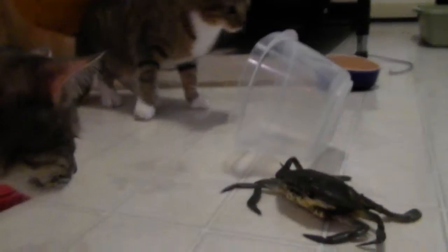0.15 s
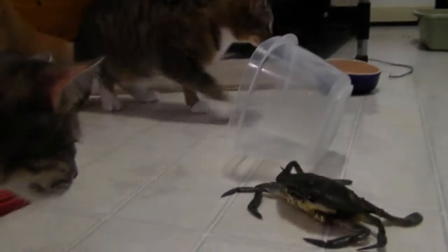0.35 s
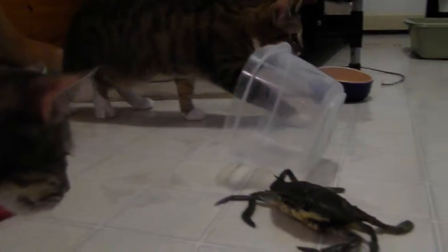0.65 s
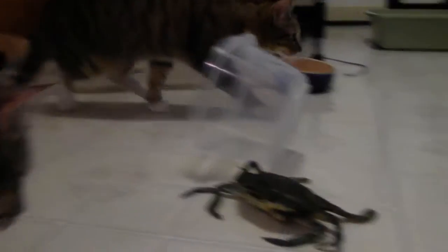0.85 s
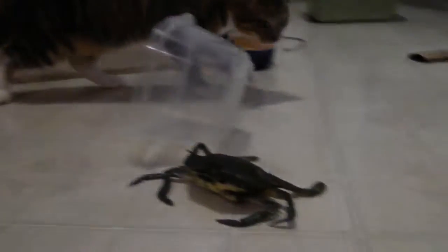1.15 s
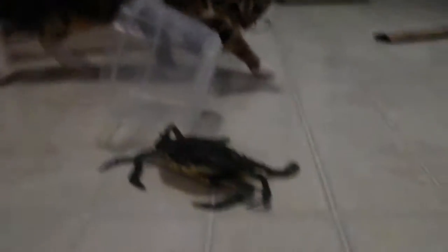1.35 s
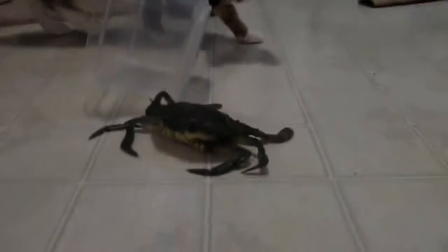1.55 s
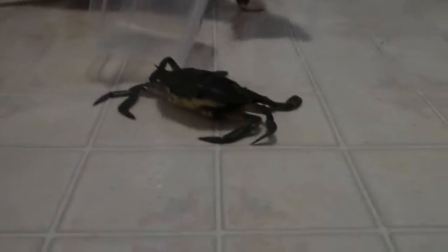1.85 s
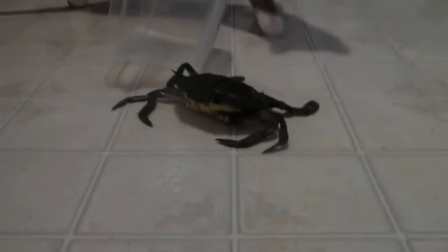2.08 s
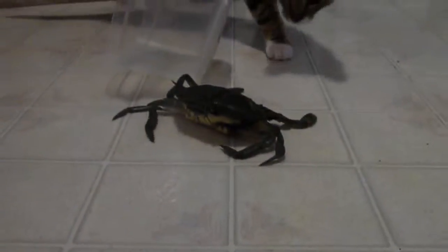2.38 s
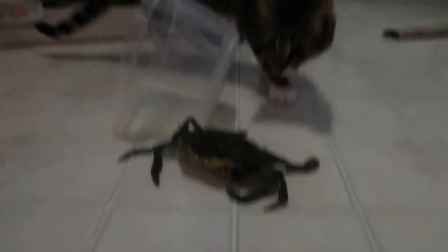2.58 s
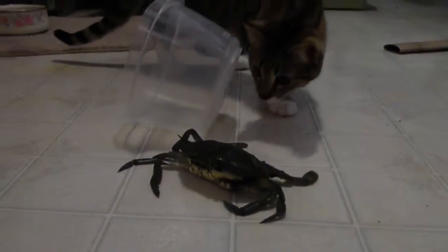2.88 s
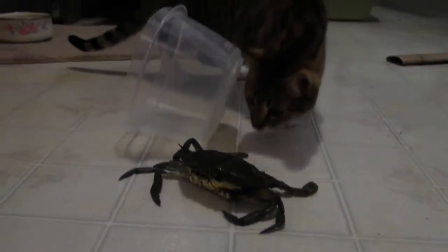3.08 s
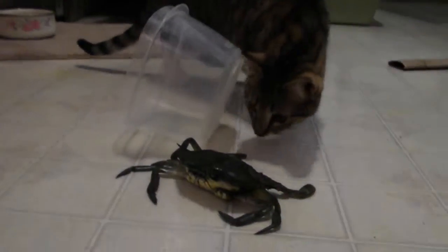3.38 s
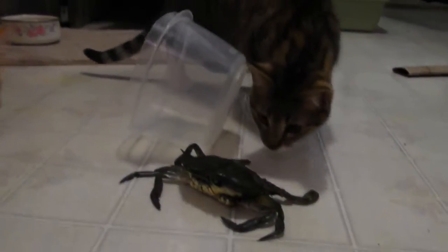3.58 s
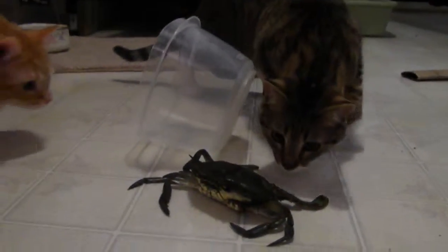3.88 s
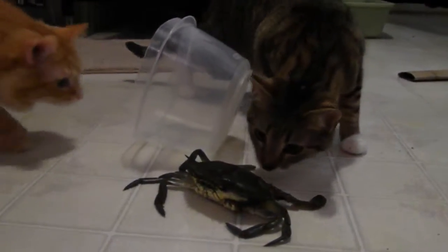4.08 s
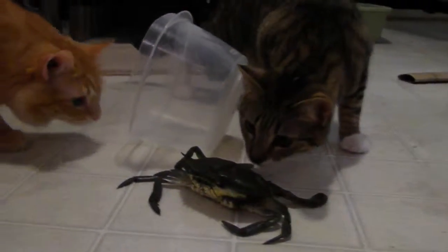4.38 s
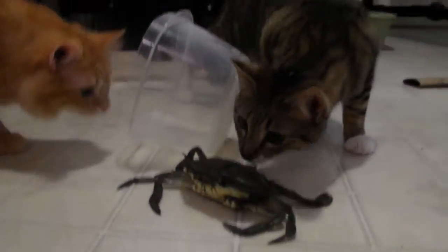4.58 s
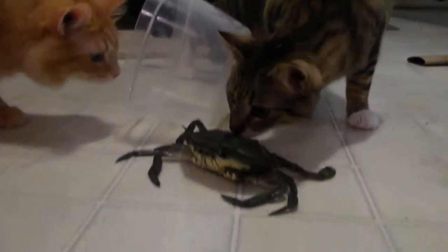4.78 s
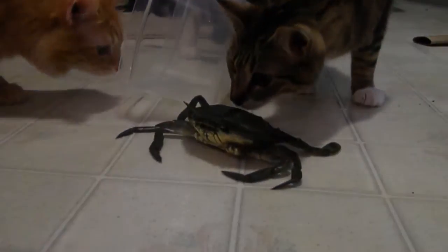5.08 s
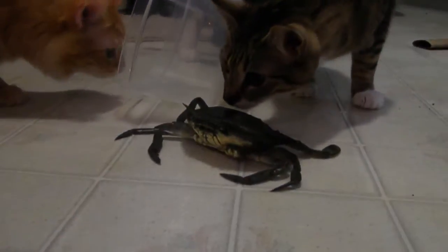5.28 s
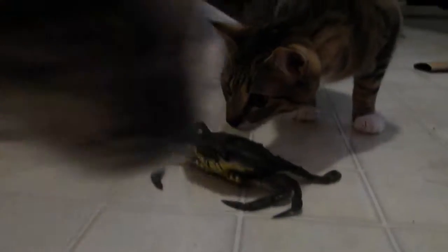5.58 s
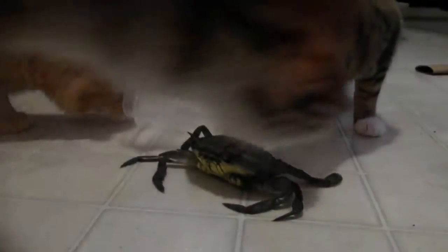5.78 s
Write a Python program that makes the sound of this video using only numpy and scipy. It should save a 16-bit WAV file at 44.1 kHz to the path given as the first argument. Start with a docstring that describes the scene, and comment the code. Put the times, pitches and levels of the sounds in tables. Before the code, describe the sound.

A small quiet room with faint steady hiss and a barely audible low hum. At 0.03 s a crisp plastic click comes with a brief skin rub; softer rubbing follows, and a low, quick stuttering creak runs from 0.35 to 0.5 s. At about 0.64 s a very loud, hard snap starts the busiest passage: hollow knocks near 0.8 and 0.97 s, bright scrapes and a sharp click around 1.03 s, then rapid thuds and clicks at 1.2-1.4 s, all close and dry. Handling weakens from 1.5 to 2.3 s into rubbing and little juddering jolts. Light clicks, scrapes and a dull knock come around 2.5 s, finger slips near 3.1 s, and a stuttering run at 3.45-3.8 s. Thin, high ticks, probably the crab on tile, appear sparsely early and gather from 3 to 5.5 s, with a small knock and scrape at 4.2 s. The end is nearly still.

```python
"""Hand on a case, crab on tiles

A hand shifts its grip on a camera case: skin rubs, scrapes, creaks and slips as modulated noise and
contact pulses; the case thuds, clicks and knocks as pulses and decaying sines. Thin ticks, probably a
crab's mouthparts and legs on a tiled floor, are noise bursts through narrow resonances. A small room
adds a decaying noise tail, over a faint hum and hiss."""
import sys
import numpy as np
from scipy import signal
from scipy.fft import rfft, irfft, next_fast_len
from scipy.io import wavfile
from scipy.ndimage import uniform_filter1d, map_coordinates

SR = 44100
rng = np.random.default_rng(int(sys.argv[2]) if len(sys.argv) > 2 else 0)


def master_out(mix):
    """Clip the mix to full scale and print it as 16-bit PCM to the path in sys.argv[1]."""
    frames = np.transpose(np.atleast_2d(mix))
    ceiling = np.clip(frames, -1, 1)
    pcm = np.round(ceiling * 32767).astype(np.int16)
    wavfile.write(sys.argv[1], SR, pcm)


N = 261933
TOP_HZ = 7700  # upper band limit of the microphone and of every contact pulse


def amp(db):
    """Decibel law: level to amplitude factor."""
    return 10 ** (np.asarray(db) / 20)


def unit(x):
    """Normalization to unit root-mean-square."""
    return x / np.sqrt(np.mean(x ** 2) + 1e-20)


def along(points, hz):
    """Interpolation of (frequency, value) points on a logarithmic frequency axis."""
    f, value = np.transpose(points)
    return np.interp(np.log(hz + 1), np.log(f + 1), value)


def wobble(rate):
    """Slow random modulation: a smooth curve through `rate` random knots per second."""
    knots = rng.standard_normal(int(N * rate / SR) + 4)
    return map_coordinates(knots, [np.arange(N) * rate / SR])


def filtered(x, response):
    """Linear filtering: the spectrum times a response of frequency."""
    size = next_fast_len(len(x) + SR // 4)
    spectrum = rfft(x, size) * response(np.fft.rfftfreq(size, 1 / SR))
    return irfft(spectrum, size)[:len(x)]


def noise(spectrum):
    """Spectral shaping of white noise; rms 1."""
    return unit(filtered(rng.standard_normal(N), lambda hz: amp(along(spectrum, hz))))


def band(x, hz, width_hz):
    """Narrow resonance: two identical resonators in series give steep sides."""
    return filtered(x, lambda f: (1j * f * width_hz / (hz * hz - f * f + 1j * f * width_hz)) ** 2)


def resonances(modes, f):
    """Modal superposition: the complex responses of all resonators add."""
    return sum(amp(db) * 1j * f * w / (c * c - f * f + 1j * f * w) for c, w, db in modes)


def add(track, s, sound):
    """Superposition: mix a sound into the track from time s."""
    part = track[max(round(s * SR), 0):][:len(sound)]
    part += sound[:len(part)]


def push(corner_hz, low_hz, order=3):
    """Contact impulse of peak 1: softer is duller, and the missing bass makes it swing back."""
    u = 2 * np.pi * corner_hz * np.arange(SR // 25) / SR
    high_pass = signal.butter(order, min(low_hz, TOP_HZ), "high", fs=SR, output="sos")
    low_pass = signal.butter(6, TOP_HZ, fs=SR, output="sos")
    swing = signal.sosfilt(high_pass, u * np.exp(-u))
    swing = signal.sosfilt(low_pass, swing)
    return swing / np.abs(swing).max()


RUN_SCATTER_S, RUN_SCATTER_DB = .0012, 1.4  # unevenness of the repeats after the first


def runs(rows, gap_s, fade_db):
    """Stick-slip repetition, nearly even and weakening: (time [s], level [dB]) of each event."""
    events = []
    for s, db, count in rows:
        events.append((s, db))
        scatter = rng.standard_normal((round(count) - 1, 2))
        for k, (late, size) in enumerate(scatter, 1):
            when = s + k * gap_s + RUN_SCATTER_S * late
            events.append((when, db - k * fade_db + RUN_SCATTER_DB * size))
    return events


def catches(grain_db):
    """Friction as granular noise: countless tiny catches of sliding skin."""
    return rng.standard_normal(N) * amp(grain_db * wobble(700))


# Resonances of the case: (frequency [Hz], width [Hz], relative level [dB])
CASE_MODES = [(1400, 180, -14.5), (2210, 220, 2.5), (2970, 260, -11.5), (4120, 200, -6.5),
              (4700, 260, -10.5), (5990, 450, -4), (6940, 710, -2.5)]


def friction(spectrum, ring_db, grain_db):
    """Friction exciting modes: skin hiss partly rings in the case; rms 1."""
    def colour(hz):
        return amp(along(spectrum, hz)) * (1 + amp(ring_db) * resonances(CASE_MODES, hz))
    return unit(filtered(catches(grain_db), colour))


# Hollow modes of the case under a pressing finger: (frequency [Hz], width [Hz], relative level [dB])
HOLLOW_MODES = [(369, 110, 0.5), (741, 350, -2.5), (1262, 120, -2)]


def hollow(grain_db, dull_hz=1900):
    """Cavity resonance: friction catches excite the hollow body of the case; rms 1."""
    def body(hz):
        return resonances(HOLLOW_MODES, hz) / np.sqrt(1 + (hz / dull_hz) ** 4)
    return unit(filtered(catches(grain_db), body))


def patchy(x, depth_db):
    """Time-varying spectrum: the colour shifts as the contact patch moves."""
    z = signal.stft(x, nperseg=512)[2]
    field = uniform_filter1d(rng.standard_normal(z.shape), size=5, axis=0)  # smooth in frequency
    field = uniform_filter1d(field, size=10, axis=1)  # smooth in time
    return unit(signal.istft(z * amp(depth_db * unit(field)), nperseg=512)[1][:N])


# Spectrum of the steady hiss: (frequency [Hz], relative level [dB])
AIR_SPECTRUM = [(15, -46), (25, -21.5), (64, -11), (98, -6.5), (261, -1.5), (347, -2.5), (431, -4.5),
                (712, -7), (765, -8), (1330, -10.5), (1460, -12), (3290, -16.5), (3620, -13.5), (7600, -20),
                (9880, -57.5), (16700, -120)]


def background(hum_hz=119):
    """Stationary noise and a tone: slowly drifting room hiss with a faint, phase-wandering hum."""
    hum = np.sin(2 * np.pi * hum_hz * np.arange(N) / SR + 0.3 * wobble(3.5))
    drift_db = .7 * wobble(4.2)
    return amp(-57.3 + drift_db) * noise(AIR_SPECTRUM) + amp(-70.5) * hum


# Reverberation time of the room: (frequency [Hz], t60 [s])
ROOM_DECAY = [(200, 0.13), (2000, 0.57), (8000, 0.12)]


def room(x):
    """Reverberation: floor and walls answer after 5 ms with a frequency-dependent decay."""
    hz, t, z = signal.stft(rng.standard_normal(SR // 2), SR, nperseg=256)
    decay = amp(-60 * t / along(ROOM_DECAY, hz)[:, None])
    tail = signal.istft(z * decay, SR, nperseg=256)[1]
    response = np.pad(tail / np.linalg.norm(tail), (SR // 200, 0))
    return signal.fftconvolve(x, response)[:N]


# Thin ticks on the floor: (time [s], level [dB], pitch [Hz])
TICK_EVENTS = [(0.566, -51, 6850), (1.651, -49.5, 3800), (2.092, -58, 4840), (2.652, -53.5, 5020),
               (3.052, -55, 6640), (3.165, -59.5, 3750), (3.233, -56, 4370), (3.43, -51.5, 4030),
               (4.028, -56.5, 3800), (4.24, -52, 3780), (4.315, -56, 4720), (4.58, -56.5, 4500),
               (4.644, -59, 7000), (4.699, -55.5, 4640), (4.768, -54, 5160), (4.809, -59, 3920),
               (4.989, -56.5, 3840), (5.051, -54, 5020), (5.389, -56.5, 3470), (5.446, -55.5, 3850),
               (5.743, -65.5, 4950)]
# Ring of the ticks, longest near 5 kHz: (pitch [Hz], t60 [s])
TICK_DECAY = [(3800, 0.011), (4300, 0.028), (4700, 0.072), (5100, .08), (7000, 0.022)]


def ticks(width_hz=950, rise_share=.04):
    """Resonant filtering: each tick is a tiny noise crackle through one narrow resonance."""
    out = np.zeros(N)
    t = np.arange(SR // 8) / SR
    for s, db, hz in TICK_EVENTS:
        t60 = along(TICK_DECAY, hz)
        shape = (1 - np.exp(-t / (rise_share * t60))) * amp(-60 * t / t60)
        ring = band(shape * rng.standard_normal(len(t)), hz, width_hz)
        add(out, s, amp(db) * np.sqrt(t60 * SR) * ring / np.linalg.norm(ring))
    return out


# Hollow knocks: (time [s], initial level [dB], pitch [Hz], t60 [s])
KNOCK_EVENTS = [(0.8009, -20.5, 1200, 0.0099), (0.8203, -17.5, 844, 0.014), (0.9676, -25, 1083, 0.018),
                (2.4611, -32, 770, .025), (4.213, -33, 1080, 0.024)]


def knocks():
    """Free vibration: parts of the case knock as single exponentially decaying modes."""
    out = np.zeros(N)
    t = np.arange(SR // 12) / SR
    for s, db, hz, t60 in KNOCK_EVENTS:
        add(out, s, -amp(db - 60 * t / t60) * np.sin(2 * np.pi * hz * t))
    return out


# Hard plastic clicks: (time [s], contact peak [dB], contact corner [Hz], lowest frequency [Hz])
CLICK_EVENTS = [(0.0345, -20, 6300, 1870), (.5842, -31, 4970, 605), (.638, -17, 6000, 1310),
                (0.6448, -4, 1900, 129), (.8205, -20.5, 2500, 600), (.94, -28, 4000, 783),
                (1.033, -13, 6030, 1500), (1.2472, -23.5, 6500, 3500), (1.2845, -19, 7000, 3500),
                (1.3905, -23, 5500, 1500), (1.621, -25.5, 3800, 496), (2.524, -32, 3520, 700),
                (2.5595, -28, 4000, 800)]


def clicks(rattle_t60=0.0055):
    """Impact: plastic parts snap together; the harder the contact, the more it rattles."""
    out = np.zeros(N)
    t = np.arange(SR // 12) / SR
    for s, db, corner_hz, low_hz in CLICK_EVENTS:
        add(out, s, amp(db) * push(corner_hz, low_hz))
        rattle = filtered(rng.standard_normal(len(t)), lambda hz: hz ** 2 / (hz ** 2 + low_hz ** 2))
        hardness = (corner_hz / TOP_HZ) ** 2
        add(out, s, amp(db + 4 - 60 * t / rattle_t60) * hardness * rattle)
    return out


# Soft jolts of the case, single or juddering: (time [s], level [dB], jolts in the run [count])
THUD_EVENTS = [(.6458, -28.5, 1), (.6565, -37, 1), (.747, -44, 1), (.7856, -32.5, 1), (.822, -26, 1),
               (.871, -40.5, 3), (.9432, -35.5, 1), (.9804, -27.5, 1), (1.0326, -26.5, 1),
               (1.0888, -28.5, 1), (1.2, -36, 2), (1.2117, -20.5, 1), (1.26, -21, 1), (1.283, -25, 1),
               (1.2977, -23, 1), (1.3165, -28, 1), (1.4335, -34.5, 1), (1.6267, -37.5, 1), (1.8, -35, 2),
               (1.8418, -37.5, 3), (1.9179, -34, 1), (1.944, -39, 4), (2.107, -37.5, 3), (2.2107, -42, 1),
               (2.2323, -37.5, 1), (3.15, -43, 2), (3.187, -40, 3), (5.32, -47.5, 1)]
JUDDER_GAP_S, JUDDER_FADE_DB = .0205, 1.84  # from one jolt of a run to the next
THUD_RING_T60_S = .016


def thuds(lead=.0013, spread=0.0016, ring_hz=480, drag_db=-8, grit_db=-11.5):
    """Elastic rebound: the grip drags the case, which springs back with a short ring and grit."""
    out, grit = np.zeros((2, N))
    t = np.arange(SR // 25) / SR
    puff = np.exp(-.5 * ((t - 2 * lead) / spread) ** 2)
    jolts = runs(THUD_EVENTS, JUDDER_GAP_S, JUDDER_FADE_DB)
    for (s, db), (soft, deep, pitch) in zip(jolts, rng.standard_normal((len(jolts), 3))):
        blow = push(corner_hz=330 * amp(soft), low_hz=125 * amp(deep), order=3)
        tone = np.sin(2 * np.pi * ring_hz * amp(1.1 * pitch) * t)
        ring = amp(-6 - 60 * t / THUD_RING_T60_S) * tone
        add(out, s - lead, amp(db + drag_db) * blow)
        add(out, s + 0.00051, -amp(db) * (blow + ring))
        add(grit, s - lead, amp(db + grit_db) * puff)
    return out + grit * friction(SKIN_SPECTRUM, ring_db=-4, grain_db=7.0)


CREAK_START_S, CREAK_END_S, CREAK_DB = .35, .52, -37.5  # level before the final low-pass
CREAK_RATE, CREAK_SPEEDUP = 106, 1.2  # slips per second at the start; last rate over first
CREAK_TAPER_DB = 6.5  # weaker at both ends


def creak(ring_hz=400, ring_t60=0.024, scatter=0.0009):
    """Stick-slip oscillation: a fingertip slips unevenly, ever faster, loudest halfway."""
    clock = np.arange(CREAK_START_S, CREAK_END_S, 1 / SR)
    rate = CREAK_RATE * CREAK_SPEEDUP ** np.linspace(0, 1, len(clock))
    slip_count = np.floor(np.cumsum(rate) / SR)
    times = clock[1:][np.diff(slip_count) > 0]
    levels = CREAK_DB - CREAK_TAPER_DB * np.linspace(-1, 1, len(times)) ** 2
    snap = push(corner_hz=840, low_hz=303, order=2)
    t = np.arange(len(snap)) / SR
    slip = snap + amp(-7.0 - 60 * t / ring_t60) * np.sin(2 * np.pi * ring_hz * t)
    out = np.zeros(N)
    for when, db, (late, size) in zip(times, levels, rng.standard_normal((len(times), 2))):
        add(out, when + scatter * late, -amp(db + 1.8 * size) * slip)
    return signal.sosfilt(signal.butter(4, 1600, fs=SR, output="sos"), out)


# Slips of a finger, single or stuttering: (time [s], hiss level [dB], slips in the run [count])
SLIP_EVENTS = [(.191, -42.5, 1), (2.288, -47, 1), (2.347, -50.5, 1), (2.523, -47.5, 1), (2.56, -49.5, 1),
               (2.624, -46.5, 1), (2.794, -47, 1), (2.81, -45.5, 1), (2.969, -44, 1), (3.035, -43.5, 1),
               (3.111, -40, 1), (3.445, -42, 1), (3.504, -44.5, 4), (3.659, -45.5, 7), (5.854, -53, 1)]
SLIP_GAP_S, SLIP_FADE_DB = .026, 1.0  # from one slip of a run to the next


def slipping(body_rise=0.0019, hiss_rise=0.0022, body_db=-0.9, jolt_db=6.5):
    """Stick-slip release: a finger lets go with a jolt and hisses for a few milliseconds."""
    t = np.arange(SR // 20) / SR
    hiss, body, jolts = np.zeros((3, N))
    jolt = push(corner_hz=1300, low_hz=383)

    def swell(rise):
        return t / rise * np.exp(1 - t / rise)

    for s, db in runs(SLIP_EVENTS, SLIP_GAP_S, SLIP_FADE_DB):
        add(hiss, s, amp(db) * swell(hiss_rise))
        add(body, s, amp(db + body_db) * swell(body_rise))
        add(jolts, s + .0007, -amp(db + jolt_db) * jolt)
    return jolts + hiss * noise(HISS_SPECTRUM) + body * hollow(grain_db=2.5)


# Harder scrapes: (time [s], length [s], hiss level [dB], body level [dB])
SCRAPE_EVENTS = [(0.582, 0.015, -43.5, -48), (.635, 0.025, -33, -41.5), (0.966, 0.03, -33.5, -39),
                 (1.027, 0.025, -27.5, -41.5), (1.086, 0.016, -29, -36.5), (1.39, 0.033, -37, -49.5),
                 (1.619, .017, -43, -54), (1.843, 0.027, -51, -50), (1.913, 0.031, -43, -50),
                 (1.96, .06, -58.5, -54), (2.328, .0076, -48, -56), (2.369, 0.032, -49.5, -46.5),
                 (2.455, 0.031, -54, -46.5), (2.503, .03, -58, -48.5), (2.848, 0.036, -47, -46.5),
                 (3.19, 0.0077, -49.5, -55), (3.306, .021, -45, -46.5), (4.209, 0.0086, -48.5, -46),
                 (4.354, 0.058, -49, -54.5), (4.449, 0.016, -50.5, -57.5)]
# Spectrum of the scraping and slipping hiss: (frequency [Hz], relative level [dB])
HISS_SPECTRUM = [(200, -30.5), (1000, -15), (2200, -3.5), (3400, -0.5), (4600, 5), (5800, 0.5),
                 (7000, -1.5), (8000, -6.5)]


def scraping(edge=0.0015, release=0.0065):
    """Gated friction: scrapes start and stop abruptly; pressing hard wakes the hollow body."""
    t = np.arange(SR // 6) / SR
    hiss, body = np.zeros((2, N))
    for s, length, hiss_db, body_db in SCRAPE_EVENTS:
        stroke = np.minimum(t / edge, 1) * np.exp(-np.maximum(t - length + edge, 0) / release)
        add(hiss, s, amp(hiss_db) * stroke)
        add(body, s, amp(body_db) * stroke)
    hissing = hiss * friction(HISS_SPECTRUM, ring_db=-3.5, grain_db=2.5)
    return hissing + body * hollow(grain_db=1.5)


# Strokes of the hand on the case: (time of fastest motion [s], fade length [s], level [dB])
STROKE_EVENTS = [(0.012, 0.031, -39.5), (0.118, 0.065, -45.5), (0.31, 0.029, -47), (.46, 0.14, -61),
                 (0.623, 0.04, -45), (0.709, 0.035, -34.5), (0.817, 0.088, -33), (0.949, 0.061, -39),
                 (1.056, 0.052, -37.5), (1.168, 0.081, -35), (1.29, 0.038, -40.5), (1.398, 0.059, -38),
                 (1.535, 0.097, -42.5), (1.725, 0.047, -47.5), (1.87, .08, -44.5), (1.982, 0.09, -47.5),
                 (2.427, 0.14, -57), (3.909, 0.069, -53), (4.266, 0.099, -51), (5.56, 0.24, -62.5)]
STROKE_RISE_SHARE, STROKE_ROUNDNESS = 0.96, 1.28  # rise over fade length; 1 = pointed, 2 = bell


def sliding():
    """Energy summation: swelling and fading strokes add in power to one sliding strength."""
    t = np.arange(N) / SR
    power = np.zeros(N)
    for s, fade, db in STROKE_EVENTS:
        away = np.maximum((s - t) / STROKE_RISE_SHARE, t - s) / fade
        power += (amp(db) * np.exp(-np.minimum(away, 10) ** STROKE_ROUNDNESS)) ** 2
    return np.sqrt(power)


# Tiny jolts while sliding: rate per second, level in the strongest stroke, scatter of level
STUMBLE_RATE, STUMBLE_DB, STUMBLE_SPREAD_DB = 70, -43, 3
STUMBLE_GROWTH = 0.56  # dB of jolt per dB of stroke


def stumbling(strength):
    """Random impulse process: the sliding hand catches and gives the case tiny dull jolts."""
    when = rng.random(N) < STUMBLE_RATE / SR
    scattered = amp(STUMBLE_DB + STUMBLE_SPREAD_DB * rng.standard_normal(N))
    size = scattered * (strength / strength.max()) ** STUMBLE_GROWTH
    return -signal.fftconvolve(when * size, push(corner_hz=300, low_hz=140))[:N]


# Spectrum of rubbing skin, also of the thuds' grit: (frequency [Hz], relative level [dB])
SKIN_SPECTRUM = [(30, -32), (90, -8), (190, 3.5), (450, -1.5), (850, -0.5), (1350, 0), (1850, -6),
                 (2600, -3), (3400, -2.5), (4500, 3), (5700, 0), (7000, -3.5), (8000, -6)]
# Swells of skin singing on one resonance: (time [s], half length [s], pitch [Hz], level [dB])
SWELL_EVENTS = [(0.819, 0.043, 7030, -37.5), (1.166, 0.088, 4900, -47), (1.494, 0.04, 4630, -46.5),
                (1.736, 0.052, 4580, -51), (1.734, 0.026, 1390, -53.5), (2.391, .013, 714, -46),
                (4.248, 0.027, 1300, -55.5), (5.41, 0.0096, 3560, -52), (5.48, 0.19, 3550, -67.5)]


def rubbing(strength, width_hz=750, waver_db=1.74):
    """Modulated friction noise: skin hisses under uneven pressure, at times singing in the case."""
    t = np.arange(N) / SR
    skin = patchy(friction(SKIN_SPECTRUM, ring_db=-3, grain_db=2.6), depth_db=2.6)
    out = strength * amp(waver_db * wobble(45)) * skin
    for s, half, hz, db in SWELL_EVENTS:
        singing = unit(band(rng.standard_normal(N), hz, min(width_hz, hz / 3)))
        out += amp(db) * np.exp(-.5 * ((t - s) / half) ** 2) * singing
    return out


def scene():
    """Direct-to-reverberant balance: the case is nearly dry; the floor carries the room."""
    strength = sliding()
    crab = ticks()
    case = knocks() + clicks() + thuds()
    skin = creak() + slipping() + scraping() + stumbling(strength) + rubbing(strength)
    hand = case + skin
    return (background() + room(amp(-22) * hand + amp(-7) * crab) + crab + hand)[None]


def record(dry, low_hz=48):
    """Band limitation: a small microphone loses the deep bass and all above a steep upper limit."""
    thin = signal.sosfilt(signal.butter(2, low_hz, "high", fs=SR, output="sos"), dry[0])
    return filtered(thin, lambda hz: 1 / np.sqrt(1 + (hz / TOP_HZ) ** 110))[None]


dry = scene()
out = record(dry)
master_out(out)
```